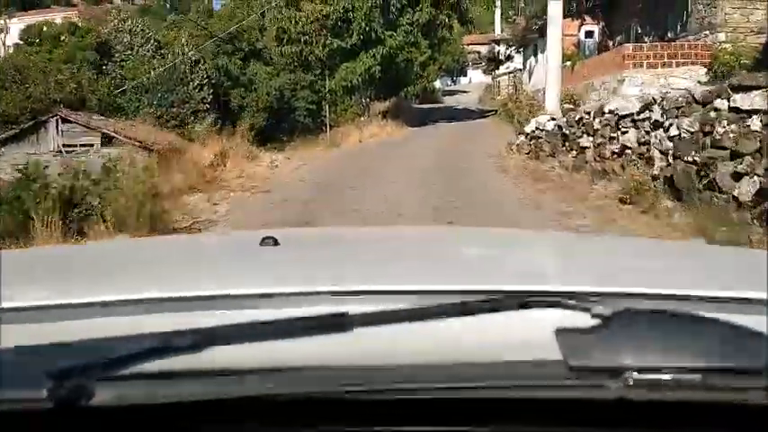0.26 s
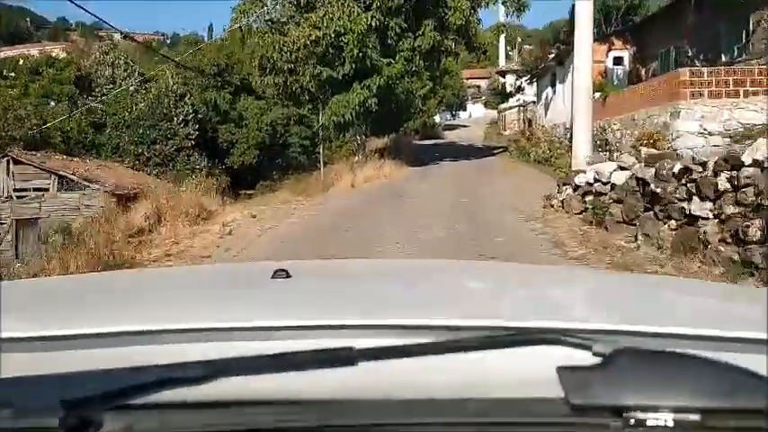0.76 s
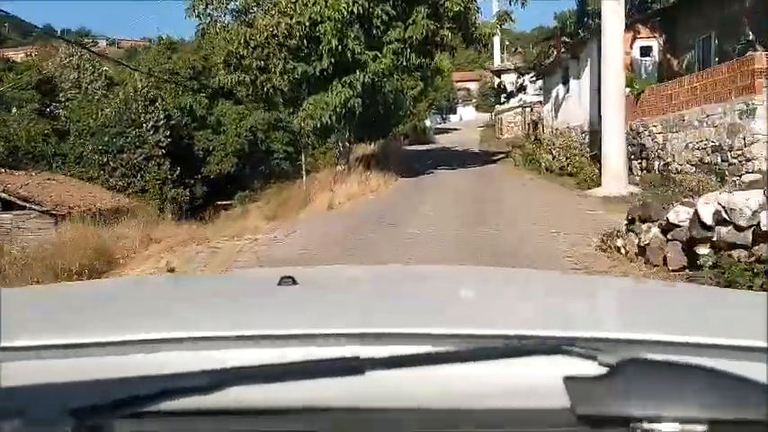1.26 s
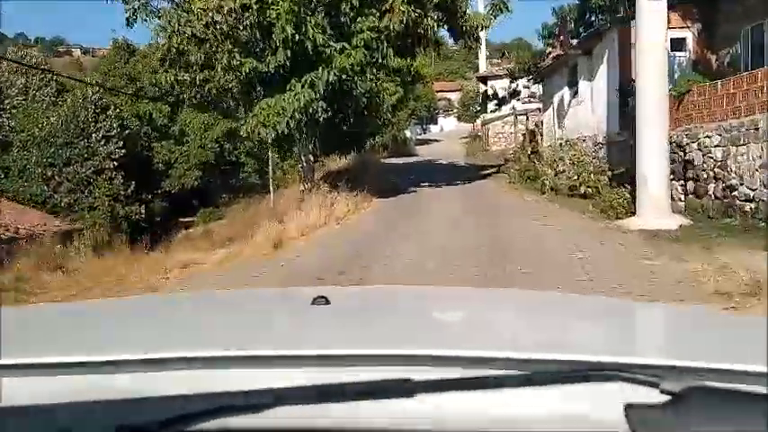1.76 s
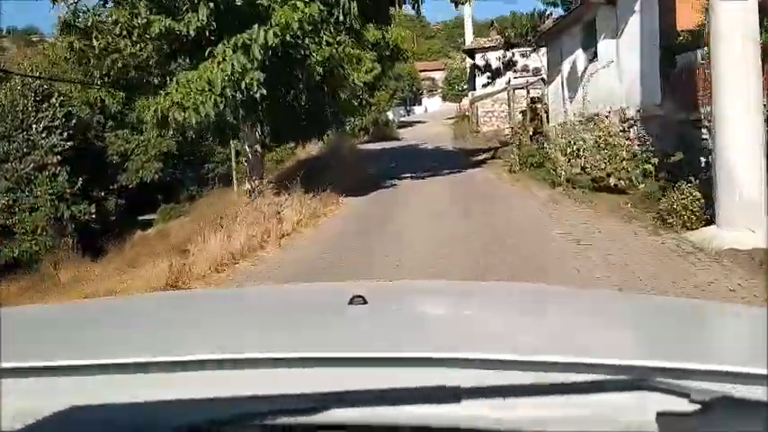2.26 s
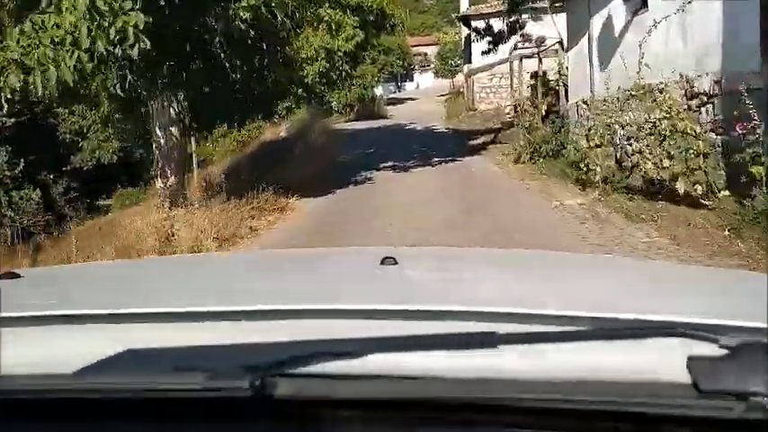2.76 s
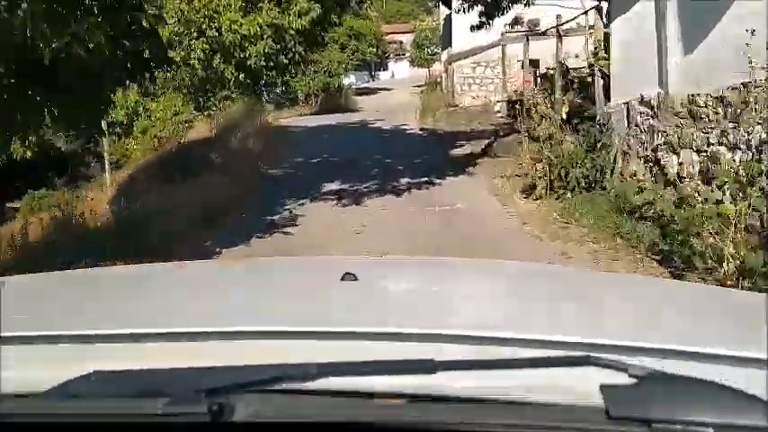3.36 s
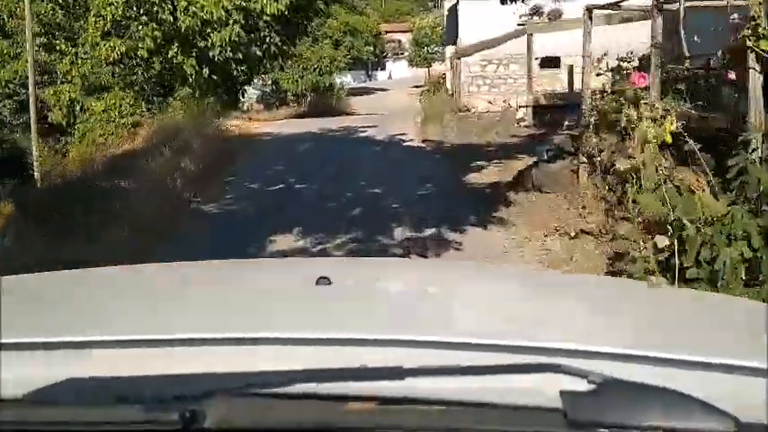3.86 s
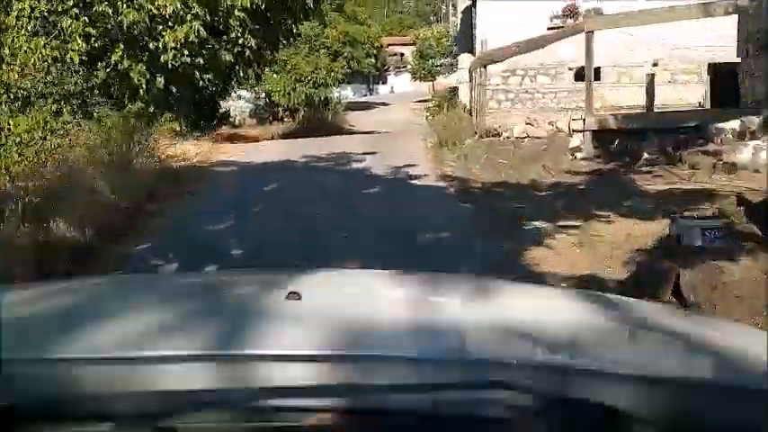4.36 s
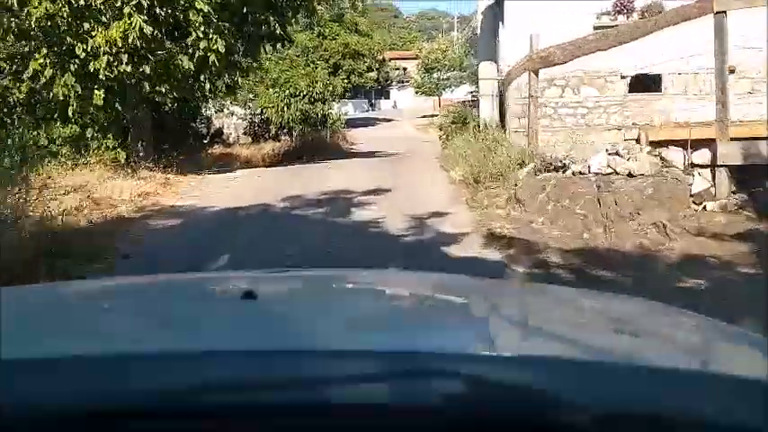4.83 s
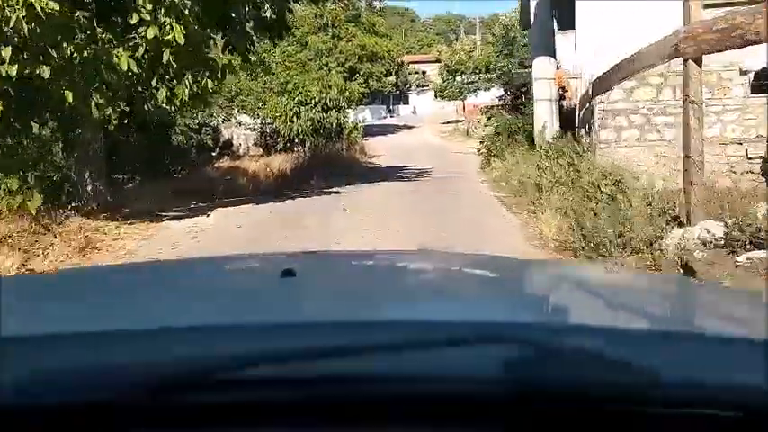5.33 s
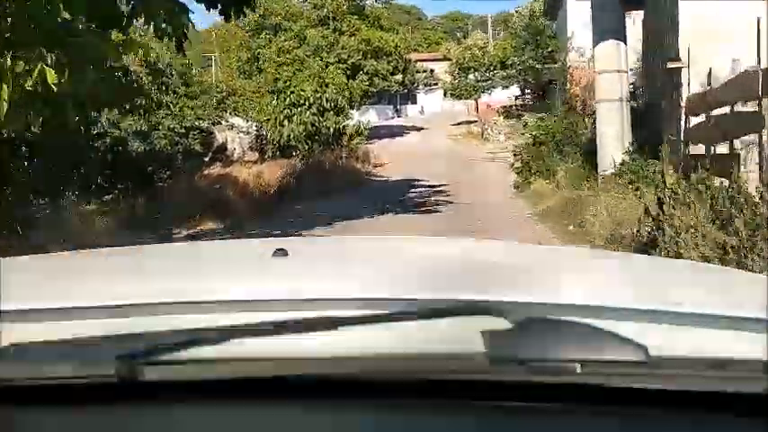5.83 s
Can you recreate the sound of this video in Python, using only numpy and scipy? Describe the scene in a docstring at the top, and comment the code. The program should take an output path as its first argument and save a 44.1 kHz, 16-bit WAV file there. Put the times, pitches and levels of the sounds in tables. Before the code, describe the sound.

A low engine drone and booming road rumble fill the cabin of a car moving slowly along a bumpy stone street. The microphone is inside, close to the dashboard. Irregular jolts bring deep thumps and clusters of trim rattles, knocks and small sharp ticks that are brightest to the right. The engine lifts a little and eases, and a loose piece chatters in short high bursts at the close.

```python
"""Inside a car climbing slowly over paving stones, heard by a two-port microphone behind the windscreen.
The engine drones at its firing rate. The stones make the body heave and the floor pan and panels boom;
each jolt shakes the trim, and loose things rattle, tick and buzz, brightest in the right port.
Underneath lies a bed of tyre, air and engine-bay hum with one faint whine."""
import sys
import numpy as np
from scipy import signal
from scipy.io import wavfile
from scipy.ndimage import uniform_filter1d

SR = 44100
rng = np.random.default_rng(int(sys.argv[2]) if len(sys.argv) > 2 else 0)


def log_audio(samples):
    """Write samples as a 16-bit WAV file to the path given in sys.argv[1]."""
    # one column per channel
    frames = np.atleast_2d(samples).T
    # limit to full scale, then quantise
    limited = np.clip(frames, -1, 1)
    pcm = np.round(limited * 32767).astype(np.int16)
    wavfile.write(sys.argv[1], SR, pcm)


N = 268701

FIRING_RATE = [(0, 45.4), (.8, 46.3), (1.5, 47.6), (2.3, 49.6), (3.0, 50.8), (3.6, 52.2), (4.2, 52.8),
               (4.8, 51.2), (5.5, 50.6), (6.09, 50.6)]  # engine pitch: t/s, f/Hz
DRONE_LEVEL = [(0, -25), (.18, -21.5), (.29, -29), (.39, -13.5), (.46, -42), (.58, -32), (.69, -17),
               (1.12, -21.5), (1.25, -17.5), (1.66, -21.5), (1.76, -33), (1.88, -26), (1.96, -20.5),
               (2.27, -19), (2.59, -20), (2.85, -18.5), (2.92, -21.5), (3.2, -14), (3.28, -25.5),
               (3.93, -22.5), (4.02, -29.5), (4.19, -25.5), (4.28, -34), (4.51, -20), (4.9, -19),
               (5.0, -23), (5.2, -19.5), (6.09, -14.5)]  # engine fundamental: t/s, level/dB
OCTAVE_LEVEL = [(0, -33.5), (1.2, -29.5), (1.8, -33.5), (2.5, -41), (3.2, -34), (3.7, -34), (4.1, -40.5),
                (4.45, -33.5), (4.7, -27), (5.6, -29.5), (6.09, -31.5)]  # second order, lifted by the cabin at some speeds: t/s, level/dB
WEAK_ORDERS = [(1.5, -21.5), (2.5, -22.5), (3, -26.5)]  # overtones: multiple of the firing rate, level against the drone/dB

HEAVE_LEVEL = [(0, -46), (.1, -18.5), (.31, -15.5), (.42, -26), (.48, -25), (.83, -23.5), (1.24, -22.5),
               (1.34, -24), (1.45, -21), (1.87, -21), (2.24, -22), (2.34, -17.5), (2.44, -35.5),
               (2.6, -17.5), (2.71, -21), (2.77, -33), (2.9, -24), (3.04, -26), (3.6, -26.5), (4.18, -27),
               (4.31, -19), (4.44, -14), (4.66, -32), (4.8, -15.5), (5.06, -24), (5.26, -23), (5.52, -31),
               (5.74, -20.5), (6.09, -44)]  # heave of the body on the uneven street: t/s, level/dB
PAVING_LEVELS = [(0, -25.5, -35), (.6, -25, -32), (1.2, -26.5, -29.5), (1.7, -25.5, -29.5), (2.3, -25, -30),
                 (3., -26, -29.5), (3.5, -27, -31), (4.2, -28.5, -34), (4.7, -27, -28.5), (5.3, -25, -26),
                 (6.09, -28, -36.5)]  # rumble between jolts: t/s, floor boom/dB, panel drumming/dB
HEAVE_MODES = [(20.45, 6.4, -4.5), (28.7, 9.2, 4.5), (37.3, 11.4, -7.5)]  # body on tyres and mounts: f/Hz, width/Hz, relative level/dB
PANEL_MODES = [(161.74, 15.4, 0.5), (175.6, 19.3, 0.5), (221.1, 19.8, -4.5)]  # roof and door panels: f/Hz, width/Hz, relative level/dB
FLOOR_EQ = [(24, -57), (40, 0.5), (59, -8), (76, -7), (130, -7.5), (172, -12.5), (226, -13), (281, -21.5),
            (325, -25.5), (420, -25), (550, -50), (920, -120)]  # colour of the floor pan's boom: f/Hz, gain/dB
# a wheel meets a raised or sunken stone: t/s, length/s, thump/dB, clunk/dB, rattle/dB, jingle/dB
STONE_JOLTS = [(0.01, 0.022, -48, -62, -64, -49.5), (0.054, 0.19, -28.5, -67, -65, -52),
               (0.265, 0.051, -28.5, -37, -44.5, -50), (0.33, 0.014, -26.5, -37, -42, -58),
               (0.466, 0.036, -29, -57, -56, -66), (0.71, 0.014, -32, -37, -50, -54),
               (0.736, 0.012, -38, -39, -52, -57), (0.927, 0.023, -46, -55, -60, -57),
               (1.246, 0.011, -23, -43, -65, -70), (1.492, 0.016, -47, -52, -53, -54),
               (1.713, 0.021, -26, -53, -51, -52), (1.87, 0.01, -27, -38, -48, -48),
               (1.988, 0.016, -45, -41, -50, -47), (2.052, 0.069, -48, -54, -67, -50.5),
               (2.15, 0.018, -35, -51, -51, -57), (2.311, 0.02, -29, -39, -49, -58),
               (2.599, 0.045, -24.5, -38, -49, -54), (2.676, 0.036, -33, -32, -44.5, -54),
               (2.808, 0.014, -29, -47, -65, -51), (2.969, 0.045, -26.5, -39.5, -46.5, -50),
               (3.023, .015, -23.5, -42, -52, -62), (3.144, .04, -48, -64, -57, -57),
               (3.968, 0.023, -38, -59.5, -67, -66), (4.395, 0.027, -22, -39.5, -48, -52),
               (4.438, 0.042, -23.5, -46, -50, -48), (4.803, 0.056, -24, -34.5, -48, -50),
               (5.215, 0.018, -46, -60, -68, -68), (5.319, 0.017, -33, -39, -57, -57),
               (5.515, .012, -31, -49, -49, -54), (5.695, 0.074, -37, -47, -54, -62),
               (6, 0.086, -40, -48, -63, -55)]
PANEL_BOOMS = [(0.0, 0.077, -23.5, 91), (.27, 0.1, -24.5, 182), (.79, 0.038, -31, 169),
               (1.46, 0.079, -29, 166.5), (1.6, 0.097, -26.5, 167), (2.08, 0.047, -27, 167),
               (2.64, 0.047, -29, 188), (2.715, 0.0098, -33, 351), (3.66, 0.26, -33, 80.5),
               (3.98, 0.047, -26.5, 162.3), (4.39, 0.049, -22, 173), (4.82, 0.042, -26, 162),
               (4.84, 0.059, -25, 80), (5.24, 0.19, -33, 221.1), (5.98, 0.13, -32, 217.3)]  # hard hits on a panel: t/s, hold/s, level/dB, f/Hz

TRIM_TREMBLE = [(0, -70, -54.5, -53.5), (1.2, -50.5, -53.5, -62), (2.4, -49, -54.5, -59.5),
                (3.1, -51, -52.5, -63), (3.6, -59, -59, -58.5), (4.3, -57, -57.5, -62),
                (5.2, -54, -56, -60.5), (6.09, -54, -51, -68)]  # shaking between jolts: t/s, clunk/dB, rattle/dB, jingle/dB
CLUNK_EQ = [(300, 8), (550, 4.5), (750, 4.5), (1150, 4), (1500, -22), (2500, -51)]  # dull dashboard: f/Hz, gain/dB
RATTLE_EQ = [(900, -17), (1400, 6.5), (2000, 1.5), (2800, -0.5), (4000, -5), (6000, -5.5), (10000, -6.5),
             (12000, -63)]  # dry trim panels: f/Hz, gain/dB
JINGLE_EQ = [(3000, -4), (5500, -5), (7500, -5), (9300, 2), (10300, -5), (11300, -11.5), (13000, -12),
             (15000, -55)]  # bright small parts: f/Hz, gain/dB
DASH_KNOCKS = [(.276, -50, 2000, 2), (0.312, -44, 2680, -7), (0.3404, -44.5, 2770, 6),
               (0.344, -42, 1350, 2), (.3475, -45, 2050, 2), (.352, -49, 4060, 3), (.4685, -45, 2830, -2),
               (0.49, -46, 3270, -8), (0.5105, -43, 2820, -9), (.7193, -48, 2150, 2),
               (.7218, -46, 3650, -5), (.7235, -54, 4500, -2), (.7285, -49, 2900, -2),
               (.741, -44, 2250, -9), (1.293, -38, 564, -10), (1.9955, -29.5, 1890, -8),
               (1.996, -41, 2490, -13), (1.9965, -36, 700, -3), (1.998, -53, 3150, -9),
               (2.136, -32, 866, -6), (2.156, -52, 2220, 3), (2.162, -52, 2800, 0), (2.584, -36, 574, -4.5),
               (2.687, -42, 1660, -2), (2.719, -32, 654, 4), (4.4045, -42, 1160, 7),
               (4.4045, -49, 3070, -3), (4.421, -49, 2150, 0), (4.4215, -48, 2930, -4),
               (4.436, -45, 2750, -6), (4.454, -50, 2860, -3), (4.463, -48.5, 2660, -16),
               (4.465, -51, 3860, -3), (4.4235, -30.5, 880, 2), (4.423, -30, 600, -1),
               (4.425, -36, 1190, 0), (4.472, -40, 1230, 0), (4.436, -40, 1140, 4), (4.455, -41, 1150, 5),
               (4.466, -38, 1130, -3), (4.492, -39, 965, 1), (4.826, -36, 1170, 0), (4.834, -37, 860, 0),
               (4.861, -32, 606, -2)]  # knocks in the dashboard: t/s, level/dB, f/Hz, left port gain/dB
LOOSE_TICKS = [(.064, -47, 7600), (.146, -46, 5200), (.2094, -43, 8500), (0.28, -37, 7200),
               (.296, -39, 9400), (0.339, -33, 9200), (0.4673, -47, 9170), (0.4903, -47, 9400),
               (0.5097, -41, 9300), (.561, -43, 9200), (.7203, -46, 4600), (.733, -45, 6500),
               (1.104, -38.5, 7200), (1.2181, -47, 7430), (1.4721, -42, 7170), (1.6721, -41, 9260),
               (1.715, -48, 6550), (1.7295, -43, 9400), (1.7345, -43, 7100), (1.736, -43, 9500),
               (1.8108, -41, 9310), (2.101, -30, 9400), (2.109, -28.5, 8760), (2.2194, -41, 8100),
               (2.6035, -48, 6750), (2.6584, -45, 6840), (2.6808, -40, 9400), (2.697, -44, 7250),
               (2.698, -43, 9000), (2.704, -45, 8800), (2.8065, -45, 9200), (2.9755, -42, 6250),
               (2.98, -45, 8900), (2.989, -40, 6350), (3.021, -48, 9150), (4.375, -47, 9100),
               (4.436, -42, 9500), (4.4543, -37, 8670), (4.464, -34.5, 9100), (4.567, -45, 9600),
               (4.6234, -41, 9800), (4.819, -46, 9200), (4.852, -44, 9000), (5.5306, -36, 8150)]  # single ticks of loose parts: t/s, level/dB, f/Hz
# a loose part chatters: t/s, length/s, start level/dB, end level/dB, gain of every second contact/dB
BUZZ_BURSTS = [(5.6495, 0.07, -44, -42, -1), (5.7275, 0.13, -38, -40, -11), (5.9045, .05, -46, -45, -12),
               (5.9865, .105, -36, -35, -4)]
PART_MODES = [(5350, -19, .07), (5930, -15, 0.12), (7200, -13, 0.05), (8130, -10, .05), (8580, -11, .05),
              (9450, -10, .05), (9800, -8, 0.06), (10500, -12, .04)]  # ring of that part: f/Hz, gain/dB, t60/s

HUM_EQ = [(150, -33), (250, 2.5), (284, -12), (327, -3.5), (384, -5.5), (429, -12), (457, -6.5), (701, -12),
          (849, -9.5), (1390, -22), (1500, -22), (5520, -35), (9180, -38), (11100, -47.5), (14400, -101),
          (22000, -120)]  # tyres, air and engine bay: f/Hz, gain/dB
CABIN_MODES = [(86, 2.6, 3.5), (116.55, 2.43, 14.5), (318.5, 33, 5), (573, 39, 7.5), (861, 180, 4),
               (867.6, 14.5, 5), (2095, 410, 5.5), (3850, 210, 4)]  # panels and cabin air that colour the noise: f/Hz, width/Hz, lift/dB
PORT_LIKENESS = [(60, 0.97), (130, 0.97), (260, 0.87), (550, 0.47), (900, 0.27), (1300, 0.35), (2200, 0.42),
                 (5000, 0.089), (10600, 0.092)]  # stereo image of the noise: f/Hz, left-right coherence (1 = alike)
PORT_LEAD = [(100, 0), (430, -0.3), (690, 0.5), (1210, 3.5), (1890, 1.5), (3000, 8)]  # phase between the ports: f/Hz, lead of the right/rad
PORT_BALANCE = [(60, -4), (110, 2), (190, 4.5), (340, -1.5), (600, -1), (1070, 3), (1900, -2), (3370, 0),
                (5990, -3.5), (10600, -14)]  # pan of the noise: f/Hz, left minus right/dB


def engine(waver_db=0.34, slip_cycles=0.0068):
    """The drone: sine orders of the firing rate; uneven firings make level and timing waver."""
    drone_db = curves(DRONE_LEVEL)[0]
    turns = firings() + slip_cycles * wander(27)
    orders = [(1, drone_db), (2, curves(OCTAVE_LEVEL)[0])]
    orders += [(order, drone_db + db) for order, db in WEAK_ORDERS]
    drone = np.zeros(N)
    for order, db in orders:
        level = gain_of(db + waver_db * order * wander(15))
        drone += level * np.sin(2 * np.pi * (order * turns + rng.random()))
    return np.sqrt(2) * drone


def road(thump, wander_hz=7.2, floor_thump_db=-2.5):
    """The stones push the body, which heaves in its low modes; floor pan and panels boom above them."""
    levels = curves(HEAVE_LEVEL) + curves(PAVING_LEVELS)
    heave_gain, floor_gain, panel_gain = (gain_of(db + swing_db * wander(wander_hz))
                                          for db, swing_db in zip(levels, (3.5, 2.07, -1)))
    push = rng.standard_normal(N)
    heave, panels = (unit_rms(sum(gain_of(db) * band(push, hz, width) for hz, width, db in modes))
                     for modes in (HEAVE_MODES, PANEL_MODES))
    swing = abs(signal.hilbert(heave))
    heave = unit_rms(heave / (swing + 0.16) ** 0.97)  # evened out, so the heave follows its level curve
    floor_gain = np.hypot(floor_gain, gain_of(floor_thump_db) * thump)
    floor = cabin_noise(FLOOR_EQ, flicker_db=1, size=4096)
    return heave_gain * heave + np.hypot(panel_gain, thump) * panels + floor_gain * floor


def jolts(rise_s=0.016, fade_db_per_s=(152, 250, 400, 400)):
    """Envelopes of thump, clunk, rattle and jingle: at each stone they rise, hold and fade."""
    t, power = np.arange(SR // 2) / SR, np.zeros((4, N + SR))
    for start, length, *levels_db in STONE_JOLTS:
        fade_db = np.outer(fade_db_per_s, np.maximum(t - rise_s / 2 - length, 0))
        envelope = np.minimum(t / rise_s, 1) * gain_of(np.c_[levels_db] - fade_db)
        power[:, round((start - rise_s / 2) * SR):][:, :len(t)] += envelope ** 2
    return np.sqrt(power[:, :N])


def panel_booms(rise_cycles=2, t60_cycles=25):
    """A panel struck hard booms at one pitch: it swells, holds and dies away."""
    out, t = np.zeros(N + SR), np.arange(SR // 2) / SR
    for start, hold, db, hz in PANEL_BOOMS:
        rise_s = rise_cycles / hz
        fade_db = 60 * np.maximum(t - rise_s - hold, 0) * hz / t60_cycles
        envelope = np.minimum(t / rise_s, 1) * gain_of(db - fade_db)
        out[round(start * SR):][:len(t)] += envelope * np.sin(2 * np.pi * (hz * t + rng.random()))
    return np.sqrt(2) * out[:N]


def trim(shakes, wander_db=1.5):
    """Bumps shake the dashboard, its panels and the small loose parts into bursts of contacts."""
    tremble = gain_of(curves(TRIM_TREMBLE) + wander_db * wander(21))
    clunk_gain, rattle_gain, jingle_gain = np.hypot(tremble, shakes)
    clunk = clatter(130, 0.77, 0.052) * cabin_noise(CLUNK_EQ, flicker_db=2.5, size=512)
    rattle = clatter(500, 1.3, 0.0084) * cabin_noise(RATTLE_EQ, flicker_db=1.2, size=512)
    jingle = clatter(300, 1.5, 0.025) * cabin_noise(JINGLE_EQ, flicker_db=1.8, size=256)
    return clunk_gain * clunk + rattle_gain * rattle + jingle_gain * jingle


def clatter(per_s, spread_db, decay_s):
    """Envelope of many small uneven contacts, each with a 1 ms attack, over a steady floor."""
    strength = gain_of(spread_db * np.minimum(rng.exponential(1, N), 3))
    hits = strength * (rng.random(N) < per_s / SR)
    pole = np.exp(-1 / (decay_s * SR))
    return unit_rms(signal.lfilter([1], [1, -pole], uniform_filter1d(hits, size=44)) + 0.5)


def knocks(t60_cycles=28, crack=0.8):
    """Dull dashboard knocks: low ones swell more slowly and ring longer than high ones."""
    hits = [(start, db, hz, t60_cycles / hz, crack, left_db) for start, db, hz, left_db in DASH_KNOCKS]
    return blows(hits, rise_cycles=1.2, snap=0.63, hold_s=0.0026)


def ticks(t60_s=0.019, crack=1.02, left_db=-17):
    """Loose parts tap out short bright ticks, all from the right."""
    hits = [(start, db, hz, t60_s, crack, left_db) for start, db, hz in LOOSE_TICKS]
    return blows(hits, rise_cycles=11, snap=0.25)


def buzz(contacts_per_s=50.7, uneven_db=3, detune=0.004, left_db=-13.5):
    """A loose part chatters near the firing rate, strong and weak in turn, ringing all its modes."""
    hits, top_hz = [], PART_MODES[-1][0]
    for start, length, start_db, end_db, weak_db in BUZZ_BURSTS:
        for k, t in enumerate(np.arange(0, length, 1 / contacts_per_s)):
            contact_db = start_db + (end_db - start_db) * t / length + weak_db * (k % 2)
            for hz, mode_db, t60 in PART_MODES:
                db = contact_db + mode_db + uneven_db * rng.standard_normal()
                pitch = hz * (1 + detune * rng.standard_normal())
                crack = 0.85 * hz / top_hz  # higher modes are grittier
                hits.append((start + t, db, pitch, t60, crack, left_db))
    return blows(hits, rise_cycles=26, snap=0)


def blows(hits, rise_cycles, snap, hold_s=0, snap_t60_s=0.0024, size=3000):
    """Each blow is a short ring roughened by a noisy crack; snap adds a broader burst to the attack."""
    out, t = np.zeros((2, N + size)), np.arange(size) / SR
    for start, db, hz, t60, crack, left_db in hits:
        grit = rng.standard_normal((2, size))  # each port gets its own grain
        burst = snap * gain_of(-60 * t / snap_t60_s) * unit_rms(resonate(grit, hz, 1.2 * hz))
        ring = np.sin(2 * np.pi * hz * t) + crack * (band(grit, hz, 0.27 * hz) + burst)
        attack = np.sin(np.pi / 2 * np.minimum(t * hz / rise_cycles, 1)) ** 2
        decay = gain_of(db - 60 * np.maximum(t - hold_s, 0) / t60)
        out[:, round(start * SR):][:, :size] += gain_of([[left_db], [0]]) * attack * decay * ring
    return out[:, :N]


def hum(level_db=-38.5):
    """A steady bed of tyre, air and engine-bay noise that throbs faintly with the firings."""
    throb = 1 + 0.045 * np.cos(2 * np.pi * firings())
    return gain_of(level_db + 0.5 * wander(0.94)) * throb * cabin_noise(HUM_EQ, flicker_db=1, size=2048)


def whine(hz=864, drift_hz=5, level_db=-58):
    """A thin tone in the cabin that drifts a little in pitch and level."""
    turns = np.cumsum(hz + drift_hz * wander(6.03)) / SR
    return np.sqrt(2) * gain_of(level_db + 1.2 * wander(4.4)) * np.sin(2 * np.pi * turns)


def cabin_noise(eq, flicker_db, size):
    """Stereo noise of rms 1, coloured by eq and the cabin modes; patches of its spectrum flicker."""
    frames, hz = 4 * N // size + 5, np.fft.rfftfreq(size, 1 / SR)
    left_re, left_im, apart_re, apart_im, patches = rng.standard_normal((frames, len(hz), 5)).T
    left, apart = left_re + 1j * left_im, apart_re + 1j * apart_im
    patches = unit_rms(uniform_filter1d(uniform_filter1d(patches, size=10, axis=0), size=8, axis=1))
    likeness, lead = at_hz(PORT_LIKENESS, hz)[:, None], at_hz(PORT_LEAD, hz)[:, None]
    right = likeness * np.exp(1j * lead) * left + np.sqrt(1 - likeness ** 2) * apart
    lift_db = sum(db / (1 + (2 * (hz - centre) / width) ** 2) for centre, width, db in CABIN_MODES)
    colour = gain_of((at_hz(eq, hz) + lift_db)[:, None] + flicker_db * patches)
    pan = gain_of(np.outer([0.5, -0.5], at_hz(PORT_BALANCE, hz)))[:, :, None]
    spectra = np.array([left, right]) * colour * pan
    return unit_rms(signal.istft(spectra, nperseg=size, noverlap=3 * size // 4)[1][:, :N])


def firings():
    """Running count of engine firings."""
    return np.cumsum(curves(FIRING_RATE)[0]) / SR


def resonate(x, hz, width):
    """One resonance at hz, its width in Hz."""
    turn, radius = np.exp(2j * np.pi * hz / SR), np.exp(-np.pi * width / SR)
    return 2 * signal.lfilter([1 - radius], [1, -radius * turn], x).real


def band(x, hz, width):
    """The same resonance twice for steeper skirts, rms 1."""
    return unit_rms(resonate(resonate(x, hz, width), hz, width))


def wander(hz):
    """Smooth random modulation up to about hz, rms 1."""
    size = round(SR / hz)
    return unit_rms(uniform_filter1d(uniform_filter1d(rng.standard_normal(N), size), size))


def curves(rows):
    """One automation curve for each value column of a time table."""
    times, *columns = np.transpose(rows)
    return [np.interp(np.arange(N) / SR, times, column) for column in columns]


def at_hz(points, hz):
    """Reads a frequency table on a log axis."""
    f, value = np.transpose(points)
    return np.interp(np.log(hz + 1), np.log(f + 1), value)


def gain_of(db):
    """Decibels to a factor."""
    return 10 ** (np.asarray(db) / 20)


def unit_rms(x):
    """Scales to rms 1."""
    return x / np.sqrt(np.mean(x ** 2) + 1e-20)


def scene():
    """The cabin mix; the same jolts drive the body and the trim."""
    thump, *shakes = jolts()
    low_end = engine() + road(thump) + panel_booms() + hum()
    return low_end + trim(shakes) + ticks() + knocks() + buzz() + whine()


def record(dry, ceiling=0.75, low_hz=12, dull_hz=11800, edge_hz=14900):
    """Deepest bass and top treble are filtered off, peaks softly rounded; a steep low-pass follows."""
    low_cut = signal.sosfilt(signal.butter(2, low_hz, "high", fs=SR, output="sos"), dry)
    dulled = signal.sosfilt(signal.butter(3, dull_hz, fs=SR, output="sos"), low_cut)
    rounded = ceiling * np.tanh(dulled / ceiling)
    band_limit = signal.firwin(511, edge_hz, window=("kaiser", 9), fs=SR)
    return signal.oaconvolve(rounded, band_limit[None], "same")


dry = scene()
out = record(dry)
log_audio(out)
```